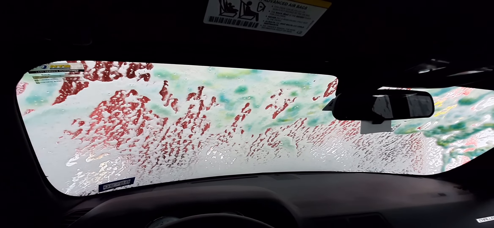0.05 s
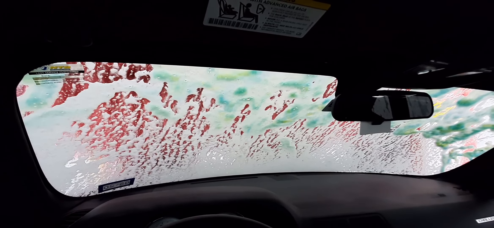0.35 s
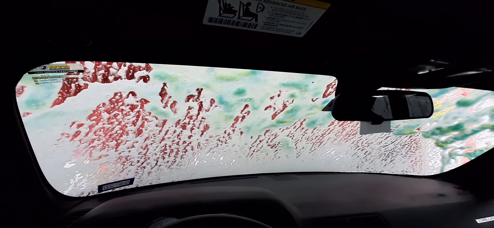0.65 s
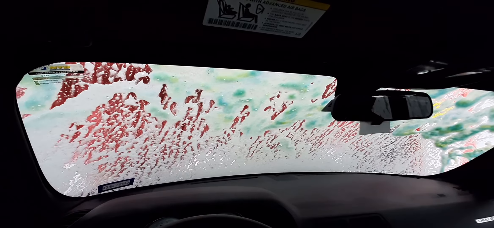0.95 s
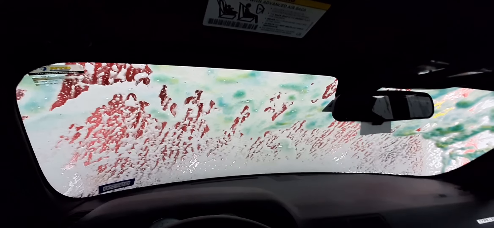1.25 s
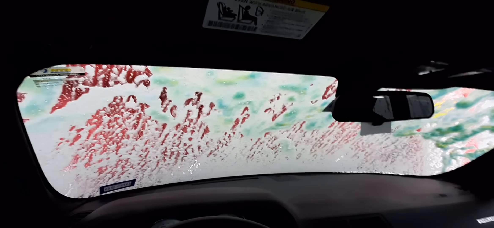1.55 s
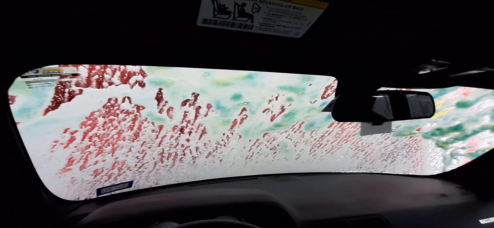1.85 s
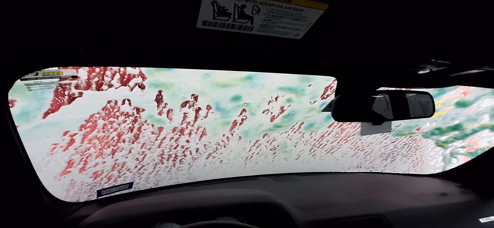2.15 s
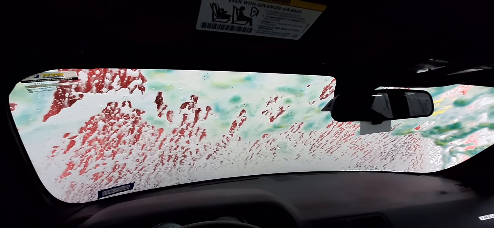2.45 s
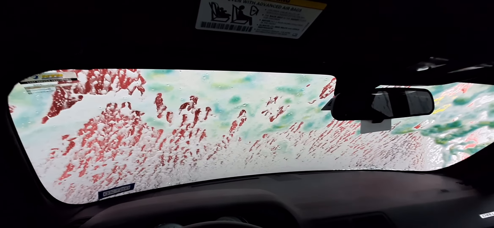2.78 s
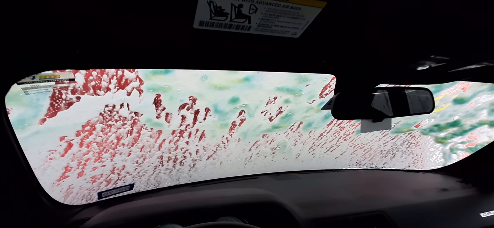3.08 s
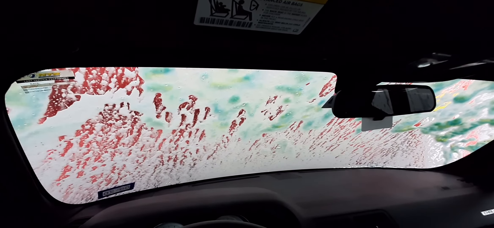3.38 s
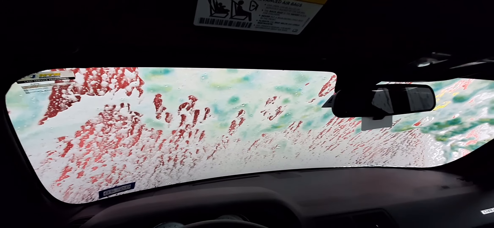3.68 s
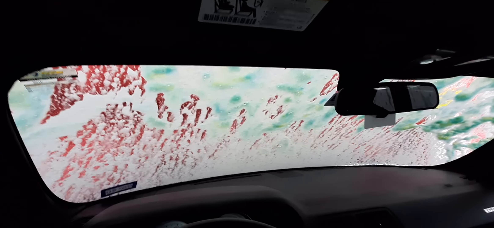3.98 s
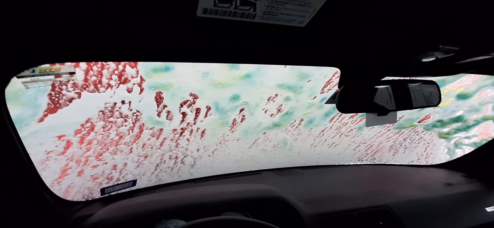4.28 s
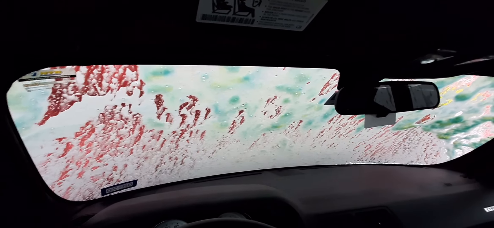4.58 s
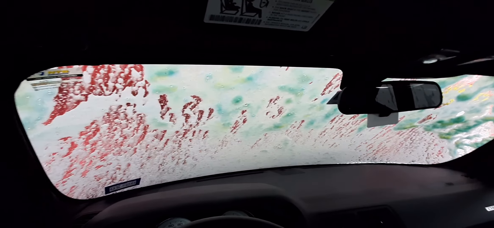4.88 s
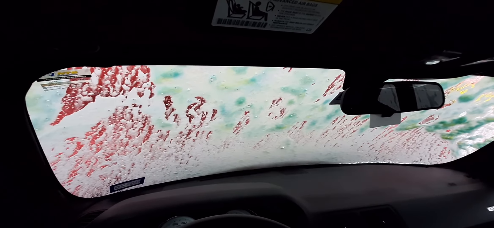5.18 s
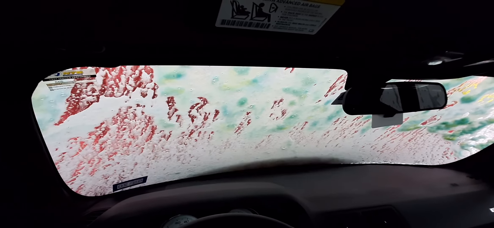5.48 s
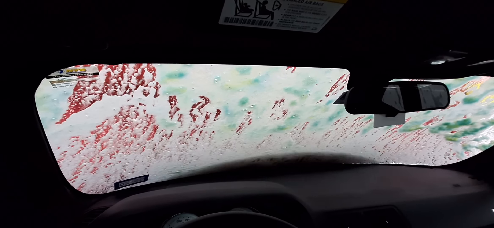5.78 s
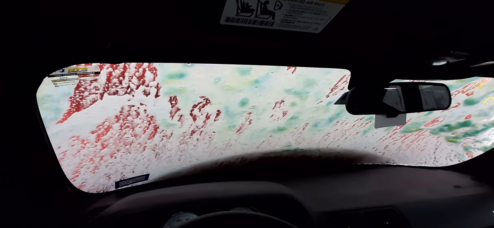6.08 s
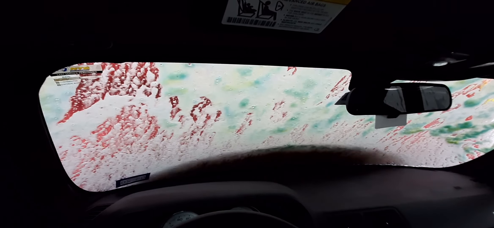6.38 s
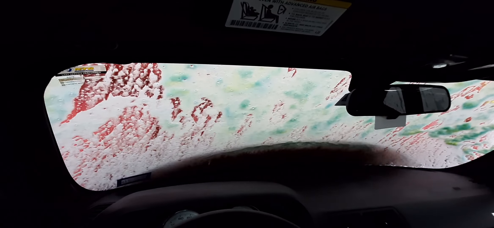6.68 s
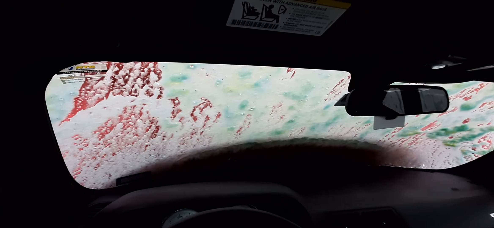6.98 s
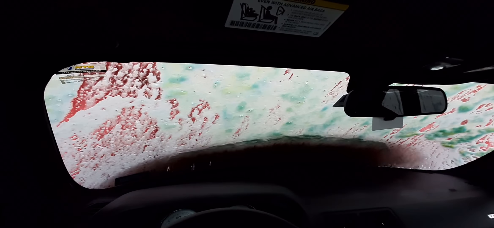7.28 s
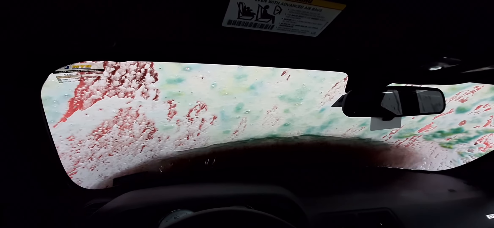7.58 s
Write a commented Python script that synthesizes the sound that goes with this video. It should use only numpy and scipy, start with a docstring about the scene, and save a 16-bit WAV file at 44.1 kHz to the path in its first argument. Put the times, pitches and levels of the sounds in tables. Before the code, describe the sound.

Foam brush strips drum and scrub on a car over humming motors, building to wet slaps and drops on the windshield, heard from inside.

```python
"""Inside a car in an automatic wash. From the start, motors rumble and pumps hum while the strips of
spinning foam brushes thump the body. Near 2 s the strips reach the hood and begin to scrub the wet paint.
Between 1.5 and 5 s, cloth rustles and a hand makes small ticks close by; at 3 s spray swishes past a
side window. From about 6 s more and more drops hit the windshield. Near 7 s the body shudders as the
brush climbs onto the glass, and soaked strips slap hard until the end."""
import sys
import numpy as np
from scipy.fft import rfft, irfft, next_fast_len
from scipy.io import wavfile
from scipy.ndimage import map_coordinates

SR = 44100
rng = np.random.default_rng(int(sys.argv[2]) if len(sys.argv) > 2 else 0)


def persist_wave(psi):
    """Save psi, clipped to +-1, as 16-bit WAV."""
    counts = np.round(np.clip(psi, -1, 1) * 32767).astype(np.int16)
    wavfile.write(sys.argv[1], SR, np.atleast_2d(counts).T)


N = 341334  # samples, about 7.7 seconds

# Levels in the tables are relative: the functions add their own gains.
# How heavily the strips land. Each row: time in seconds, thump level in dB, slap level in dB.
STRIP_WEIGHT = [(0, -41, -47), (1.6, -41, -48.5), (1.9, -41.5, -41.5), (2.3, -35.5, -39.5),
                (2.8, -35.5, -38), (3.1, -32, -34), (3.3, -35, -37), (3.7, -33.5, -37), (4.35, -32.5, -37),
                (4.8, -31, -35), (5.3, -29.5, -36.5), (5.7, -32.5, -35), (6.1, -31.5, -35),
                (6.45, -31.5, -37.5), (6.7, -30.5, -32.5), (7.3, -28, -32), (7.74, -31, -32)]
# How hard the brush tips scrub the paint. Each row: time in seconds, level in dB.
SCRUB_LEVEL = [(0, -18), (.9, -20.5), (1.2, -26), (1.62, -23.5), (1.82, -11.5), (2.3, -5), (2.85, -5),
               (3.12, -3), (3.6, -3), (4.6, 0), (5.3, 0), (6.3, 4.5), (7.0, 6.5), (7.74, 8.5)]
# Bunches of strips that make a panel boom.
# Each row: peak time in seconds, level in dB, pitch in Hz, half length in seconds.
BOOMS = [(0.021, -23, 133.7, 0.033), (0.425, -32, 149, 0.054), (1.335, -28, 106.7, .02),
         (1.913, -27, 115.3, 0.021), (2.356, -25, 123.2, 0.039), (2.453, -29, 126, 0.046),
         (3.93, -30, 125.8, 0.048), (4.273, -25, 122, 0.019), (4.492, -25.5, 158, 0.019),
         (4.593, -24, 156.8, 0.027), (5.07, -25.5, 162, 0.031), (5.164, -21.5, 157, .037),
         (5.259, -21, 159.2, 0.03), (5.454, -24, 119.6, .026), (5.906, -22.5, 160.3, 0.032),
         (6.706, -22, 147, 0.015), (7.028, -21.5, 125.8, 0.031), (7.272, -23, 116.7, 0.027),
         (7.516, -23, 120.3, 0.016), (7.686, -25, 164.4, 0.046)]
# Hard slaps of single strips. Each row: time in seconds, level in dB.
HARD_SLAPS = [(1.389, -51), (1.965, -51), (3.347, -43), (4.417, -41), (6.782, -26.5), (6.861, -35),
              (6.936, -28), (7.211, -26), (7.248, -28), (7.299, -23), (7.393, -26.5), (7.444, -20.5),
              (7.546, -26), (7.579, -27), (7.616, -20), (7.661, -25), (7.698, -25.5)]
# How much spray reaches the glass. Each row: time in seconds, level in dB.
SPRAY_LEVEL = [(0, -67.5), (.72, -70), (1.1, -75.5), (1.9, -72.5), (2.4, -65.5), (4.3, -64.5), (4.9, -62),
               (5.85, -59.5), (6.35, -52), (7.35, -42), (7.74, -41.5)]
# The biggest drops on the windshield. Each row: time in seconds, level in dB, pitch in Hz.
BIG_DROPS = [(6.3226, -38, 4290), (6.3944, -32, 3170), (6.4683, -37, 3310), (6.5075, -33.5, 3530),
             (6.602, -41, 4280), (6.6832, -30.5, 4710), (6.868, -29, 4730), (6.913, -31.5, 4310),
             (6.9432, -31.5, 3820), (6.9638, -34.5, 3480), (7.0035, -35.5, 4790), (7.0214, -43, 4340),
             (7.0847, -34, 2910), (7.1174, -29.5, 3700), (7.1499, -25, 3970), (7.1625, -24.5, 3770),
             (7.2194, -33.5, 3800), (7.2537, -27.5, 3700), (7.2763, -28.5, 4000), (7.305, -32, 3830),
             (7.3315, -33.5, 3610), (7.3635, -28, 3390), (7.38, -24, 4630), (7.4135, -25, 3110),
             (7.4568, -33.5, 3640), (7.51, -28.5, 3980), (7.5258, -23, 4600), (7.549, -30.5, 3840),
             (7.5618, -26, 3150), (7.6259, -19, 4600), (7.643, -34, 4780), (7.675, -28, 4000),
             (7.691, -29, 4550), (7.7098, -24, 3860)]
# Slides of cloth. Each row: peak time in seconds, level in dB, rise and fall in seconds, extra hiss in dB.
CLOTH_SLIDES = [(2.07, -77, 0.066, 0.12, 6.5), (2.35, -68.5, 0.12, 0.16, 6.5),
                (3.25, -70.5, 0.06, 0.07, 1.5), (3.66, -74, 0.22, 0.25, 4.5), (4.5, -60, 0.15, 0.051, -6),
                (4.63, -49.5, 0.085, 0.12, 1)]
# Ticks of a hand. Each row: start in seconds, level in dB, left minus right in dB,
# treble tilt in dB per octave, echo level in dB, ringing pitch in Hz.
HAND_TICKS = [(1.5532, -20, 18, 0.5, -17.5, 1040), (1.5553, -13, 23, -0.5, -13, 1040),
              (1.5577, -18.5, 21, 4, -12.5, 1040), (1.5593, 2.5, 25, 2, -35.5, 1040),
              (1.825, -26, -2, -8, -6.5, 3150), (2.326, -42, -6, 7.5, -18, 7000),
              (2.333, -42.5, 6, 22, -12.5, 6960), (4.382, -34, 4, 2.5, -3, 5800),
              (4.494, -26.5, 5, 3.5, -4.5, 6000)]

# Resonances, the pitches at which a thing likes to ring. Each row: pitch in Hz, width in Hz, level in dB.
PANEL_MODES = [(77.2, 10, 5), (117.5, 27, 1.5), (158.6, 20, -2), (272, 40, -2.5), (350.7, 27, 4),
               (530, 22, -7.5), (827, 49, 2.5), (1543, 23, 4), (1844, 98, 1), (2044, 46, 9),
               (2216, 57, 5.5)]  # body panels and cabin
HOOD_MODES = [(667, 270, 0)]  # the sheet of the hood
BODY_MODES = [(44, 23, 0)]  # the whole body shaking
WINDSHIELD_MODES = [(805.4, 58, 0), (1234, 320, -3.5), (2000, 300, -6)]  # the hollow-sounding pane
PUMP_MODES = [(51, 39, 2), (347, 26, 8.5), (830, 31, -15), (1525, 57, -10.5), (2033, 96, -24)]  # droning motors and pumps

# Tone colours, from bass to treble. Each row: frequency in Hz, level in dB.
THUMP_TONE = [(20, -35.5), (40, -29.5), (65, -10.5), (110, -2), (165, 0), (215, -4.5), (300, -17.5),
              (600, -84.5)]  # heavy strips landing
SLAP_TONE = [(130, -31), (220, 1.5), (290, -3), (380, -5.5), (480, -8), (600, -14), (900, -21.5),
             (2000, -81.5)]  # their tips landing
SCRUB_TONE = [(350, -20), (520, 2.5), (610, 3), (740, 4.5), (830, 0), (1020, 0.5), (1380, -1.5), (1650, -8),
              (2200, -20), (2700, -16.5), (5000, -56.5)]  # tips dragging over wet paint
KNOCK_TONE = [(250, 0), (550, -6.5), (790, 3.5), (1100, -4.5), (1500, -5), (2300, -20), (4000, -19.5),
              (9000, -65.5)]  # a panel or pane being struck
SMACK_TONE = [(500, -11), (850, 5.5), (1300, 4.5), (2100, -6.5), (3200, -9), (5000, -14), (8000, -31),
              (10000, -50)]  # the wet smack of a soaked strip
MIST_TONE = [(900, -26), (2000, 2), (2700, -2.5), (3300, 4), (4700, 0), (5600, -4), (7800, -11.5),
             (9000, -58), (11500, -14.5), (13500, -20), (16000, -30)]  # distant spray
PATTER_TONE = [(700, -13.5), (1300, 8), (2000, 2.5), (2700, -8), (3300, -4), (4700, -0.5), (5600, -11),
               (7800, -6.5), (9000, -20.5), (11500, -8.5), (13500, -21.5), (16000, -38)]  # small drops right on the glass
FIZZ_TONE = [(5000, -14), (8000, -1), (9000, -9), (11500, 2.5), (13500, -4), (15700, -14)]  # the first fine spray on the glass
SWISH_TONE = [(1200, 0), (1700, 7), (2300, 9), (2850, 12), (3500, -1), (5000, -10), (8000, -30)]  # spray passing the side window
SPLASH_TONE = [(600, -8), (1000, 1), (1500, 2), (2500, -2), (3200, 0), (4700, 1), (5800, -6), (7800, -8),
               (9000, -24), (11500, -26), (15000, -48)]  # a big drop bursting
WEAVE_TONE = [(900, -9), (1600, 9.5), (2400, 8), (3000, 9), (4100, 9), (6000, 5), (7900, 3), (9000, -24.5),
              (11000, -26)]  # the rasp of cloth catching
FIBRE_TONE = [(4000, -6.5), (7500, -24), (9200, -15), (11300, 2), (13500, 4), (14600, -4), (15700, -8)]  # the thin hiss of cloth sliding
TICK_TONE = [(200, -1), (600, -4), (1050, 5), (2200, -11), (3100, 1.5), (5000, -2), (7700, -6.5),
             (8800, -27.5), (11500, -14), (15500, -26)]  # a hand on plastic
RUMBLE_TONE = [(20, -28), (40, -15.5), (55, -6), (105, 1), (158, -1.5), (200, -8), (360, -11), (515, -15.5),
               (565, -30), (800, -33), (1000, -36.5), (1300, -31.5), (1900, -47), (2700, -53), (7600, -50),
               (9200, -90)]  # motors behind closed doors
AIR_TONE = [(9000, -19.5), (10600, 6), (12000, 4), (15700, 4.5)]  # faint, very high hiss

# How alike the two ears hear the cabin. Each row: frequency in Hz, likeness (1 is the same, 0 unrelated).
EAR_LIKENESS = [(60, 1), (140, 0.9), (300, 0.75), (650, 0.67), (1400, -0.24), (4000, 0.07), (12000, 0)]
# Which ear hears more. Each row: frequency in Hz, left minus right in dB.
EAR_BALANCE = [(100, 0), (200, -1.7), (380, -1.5), (800, -2.5), (1500, -4.5), (4400, -3.5), (12000, -2)]


def brushes(scrub_db=-43):
    """Heavy strips thump the body; their tips slap it and drag over the paint in tiny slips."""
    contact_db, = curves(SCRUB_LEVEL)
    thump_db, slap_db = curves(STRIP_WEIGHT)
    bunching = wobble(22)  # the strips arrive in bunches
    thumps = cabin(panels(impacts(rate=450, spread_db=0)), THUMP_TONE)
    tips = cabin(panels(impacts(rate=800, spread_db=2.5)), SLAP_TONE)
    slips = cabin(panels(impacts(rate=1300, spread_db=1.5) + 0.99 * noise()), SCRUB_TONE)
    return (amp(thump_db) * thumps
            + amp(slap_db + 0.41 * bunching) * tips
            + amp(scrub_db + contact_db + 0.42 * bunching) * slips)


def booms(gain_db=-2):
    """Each bunch of strips sets a panel swinging at one low pitch for a few cycles."""
    t = np.arange(N) / SR
    drift = 0.47 * wobble(70)  # makes the pitch waver
    out = np.zeros(N)
    for peak_s, db, hz, half_s in BOOMS:
        tone = np.sin(2 * np.pi * (hz * t + rng.random()) + drift)
        out += amp(db + gain_db) * swell(peak_s, half_s, half_s) * tone
    return out


def hood(level_db=-54):
    """The first strips drag over the wide hood, which roars and calms as the brush moves on."""
    drag = noise() + impacts(rate=480, spread_db=1)
    roar = filtered(drag, lambda hz: resonances(HOOD_MODES, hz))
    return amp(level_db) * swell(peak_s=1.865, rise_s=0.1, fall_s=1.47) * cabin(roar, SCRUB_TONE)


def slaps(knock_db=-4, smack_db=-10, knock_t60=0.086, smack_t60=0.067, delay_s=0.00161):
    """A soaked strip lands flat with a wet smack and drums briefly on the pane or panel."""
    t = np.arange(-SR // 50, SR // 8) / SR
    knock = cabin(panels(noise()), KNOCK_TONE)
    smack = cabin(noise(), SMACK_TONE)
    out = np.zeros((2, N + SR))
    for layer_db, t60, sound in [(knock_db, knock_t60, knock), (smack_db, smack_t60, smack)]:
        shape = burst(t, rise_t60=0.017, fall_t60=t60)
        shape_rms = np.sqrt(np.mean(shape ** 2))
        for time_s, db in HARD_SLAPS:
            pick = rng.integers(N - len(t))  # each slap takes a random piece of the noise
            blow = unit(shape * sound[:, pick:pick + len(t)]) * shape_rms
            start = round((time_s + delay_s + t[0]) * SR)
            out[:, start:start + len(t)] += amp(db + layer_db) * blow
    return out[:, :N]


def shudder(level_db=-45):
    """The whole body gives a deep, brief shake as the brush climbs onto the windshield."""
    shake = filtered(noise(), lambda hz: resonances(BODY_MODES, hz))
    return amp(level_db) * swell(peak_s=6.8, rise_s=0.17, fall_s=0.17) * cabin(shake, THUMP_TONE[:3])


def spray(mist_db=3, patter_db=2, near_db=-48, swish_db=-57, fizz_db=-64.5):
    """Distant spray is a smooth hiss; near the glass it breaks up into clumps of single drops."""
    level_db, = curves(SPRAY_LEVEL)
    drop_share = 1 / (1 + amp(2 * (near_db - level_db)))  # one half when the level reaches near_db
    mist = amp(mist_db) * np.sqrt(1 - drop_share) * cabin(noise(), MIST_TONE)
    drops = droplets()
    clumps_db = 1.4 * wobble(28) + 2.4 * wobble(160)
    patter = amp(patter_db + clumps_db) * np.sqrt(drop_share) * cabin(drops + 1.27 * noise(), PATTER_TONE)
    swish = swell(peak_s=3.0, rise_s=0.031, fall_s=0.23) * cabin(noise(), SWISH_TONE)
    fizz = swell(peak_s=6.3, rise_s=0.35, fall_s=0.45) * cabin(noise(), FIZZ_TONE)
    return amp(level_db) * (mist + patter) + amp(swish_db) * swish + amp(fizz_db + clumps_db) * fizz


def droplets(rate=840, pitch_hz=5600, pitch_spread=0.5, fade_cycles=0.5, spread_db=7):
    """Two showers of small drops: each is a soft, nearly toneless blip of its own pitch and size."""
    t = np.arange(SR // 200) / SR
    count = int(rate * N / SR)
    showers = []
    for starts in rng.integers(0, N, (2, count, 1)):
        pitch, size = np.clip(rng.standard_normal((count, 2)).T[..., None], -2.2, 2.2)
        hz = pitch_hz * np.exp(pitch_spread * pitch)
        cycles = hz * t
        shape = cycles * np.exp(-cycles / fade_cycles)
        blips = amp(spread_db * size) * np.sqrt(hz) * shape * np.sin(2 * np.pi * cycles)
        places = starts + np.arange(len(t))
        showers.append(np.bincount(places.ravel(), blips.ravel(), N)[:N])  # add each blip at its place
    return unit(np.array(showers))


def big_drops(crack_db=-3, splash_db=-14, knock_db=-7, ring_db=6, ring_width_hz=700, delay_s=0.0018):
    """Fine spray runs ahead of a big drop; it bursts with a wet ping, knocks the glass and scatters."""
    t = np.arange(-SR // 20, SR // 10) / SR
    crack = amp(crack_db) * burst(t, rise_t60=0.0044, fall_t60=0.0089)
    splash = amp(splash_db) * burst(t, rise_t60=0.065, fall_t60=0.16)
    knock = amp(knock_db) * burst(t, rise_t60=0.0044, fall_t60=0.037)
    pings, knock_gain = np.zeros((2, N + SR)), np.zeros(N + SR)
    for time_s, db, pitch_hz in BIG_DROPS:
        ring = [(pitch_hz, ring_width_hz, ring_db)]
        ping = filtered(rng.standard_normal((2, len(t))),
                        lambda hz: amp(along(SPLASH_TONE, hz)) * np.sqrt(1.5 + resonances(ring, hz)))
        start = round((time_s + delay_s + t[0]) * SR)
        pings[:, start:start + len(t)] += amp(db) * (crack + splash) * unit(ping)
        knock_gain[start:start + len(t)] += amp(db) * knock
    return pan(-3) * pings[:, :N] + knock_gain[:N] * cabin(panels(noise()), KNOCK_TONE)


def windshield(gain_db=2.5):
    """The pane rings hollow as ever more water and strips land on it."""
    level_db, = curves(SPRAY_LEVEL)
    drumming = filtered(impacts(rate=600, spread_db=1.5), lambda hz: resonances(WINDSHIELD_MODES, hz))
    return amp(level_db + gain_db) * cabin(drumming, KNOCK_TONE)


def cloth(weave_db=7, firm_db=-47):
    """Sliding cloth hisses thinly; pressed harder, its weave catches and adds a fuller rasp."""
    slide, hiss = np.zeros((2, N))
    for peak_s, db, rise_s, fall_s, hiss_db in CLOTH_SLIDES:
        stroke = amp(db) * swell(peak_s, rise_s, fall_s)
        slide += stroke
        hiss += amp(hiss_db) * stroke
    rasp = amp(weave_db) * slide * (slide / amp(firm_db)) ** 0.21  # grows faster than the hiss
    catching = amp(0.5 * wobble(25) + 1.1 * wobble(220))
    fibres = unit(coloured(noise() + 0.5 * impacts(rate=3700, spread_db=1), FIBRE_TONE))
    weave = unit(coloured(noise() + 0.5 * impacts(rate=1300, spread_db=2.5), WEAVE_TONE))
    return catching * (hiss * fibres + rasp * weave)


def ticks(echo_gain_db=-8, echo_t60=0.042, pivot_hz=3500, ring_width_hz=350, ring_db=11):
    """A hand ticks on plastic: a dry click, then a short echo in which the touched trim rings."""
    t = np.arange(SR // 10) / SR
    octaves = lambda hz: np.log2(np.maximum(hz / pivot_hz, 0.5))
    out = np.zeros((2, N + SR))
    for start_s, db, pan_db, tilt, echo_db, ring_hz in HAND_TICKS:
        ring = [(ring_hz, ring_width_hz, ring_db)]
        trim = filtered(rng.standard_normal((2, len(t))), lambda hz: np.sqrt(0.5 + resonances(ring, hz)))
        click = t == 0
        echo = amp(echo_gain_db + echo_db - 60 * t / echo_t60) * trim
        tick = filtered(click + echo, lambda hz: amp(along(TICK_TONE, hz) + tilt * octaves(hz)))
        start = round(start_s * SR)
        out[:, start:start + len(t)] += amp(db) * unit(pan(pan_db)) * tick
    return out[:, :N]


def machinery(rumble_db=-42, whine_db=-47):
    """Motors make a restless rumble behind the closed doors, and pumps whine over it."""
    motors = filtered(noise(), lambda hz: np.sqrt(1 + resonances(PANEL_MODES[:3], hz)))
    pumps = filtered(noise(), lambda hz: np.sqrt(resonances(PUMP_MODES, hz)))
    rumble = cabin(motors, RUMBLE_TONE)
    whine = cabin(pumps, tone=[(25, -23.5), (45, 2.5), (2100, -4.5), (2700, -25)])
    return amp(rumble_db + 0.87 * wobble(7.3)) * rumble + amp(whine_db + wobble(11)) * whine


def hum(pitch_hz=119.6, level_db=-47):
    """A pump motor hums, a little unsteady under its load."""
    gain = amp(level_db + 1.5 * wobble(3.5))
    return gain * np.sin(2 * np.pi * pitch_hz * np.arange(N) / SR + 0.64 * wobble(7))


def panels(x):
    """The car body passes the whole sound and rings along at its resonances."""
    return filtered(x, lambda hz: np.sqrt(1 + 2 * resonances(PANEL_MODES, hz)))


def cabin(pair, tone):
    """Colours two noises as heard inside: bass alike in both ears, treble wide and more to the right."""
    signs = np.array([[1], [-1]])
    likeness = lambda hz: np.clip(along(EAR_LIKENESS, hz), -0.99, 0.99)
    shared, opposed = filtered(pair, lambda hz: amp(along(tone, hz)) * np.sqrt(1 + signs * likeness(hz)))
    ears = np.array([shared + opposed, shared - opposed])
    return unit(filtered(ears, lambda hz: amp(signs * along(EAR_BALANCE, hz) / 2)))


def resonances(modes, hz):
    """How much power a ringing thing passes at each frequency."""
    return sum(amp(db) ** 2 / (1 + (2 * (hz - pitch) / width) ** 2) for pitch, width, db in modes)


def impacts(rate, spread_db):
    """Two streams of random blows, about rate a second; spread_db makes their sizes uneven."""
    hits = rng.random((2, N)) < rate / SR
    return unit(hits * amp(spread_db * noise()) * np.sign(noise()))


def noise():
    """Two unrelated white noises."""
    return rng.standard_normal((2, N))


def wobble(rate):
    """A smooth curve through rate random points a second."""
    points = rng.standard_normal(int(N * rate / SR) + 4)
    return map_coordinates(points, [np.arange(N) * rate / SR])


def swell(peak_s, rise_s, fall_s):
    """A bell-shaped gain that reaches 1 at peak_s."""
    t = np.arange(N) / SR - peak_s
    return np.exp(-(t / np.where(t < 0, rise_s, fall_s)) ** 2)


def burst(t, rise_t60, fall_t60):
    """A gain that shoots up to 1 at t = 0 and dies away. A t60 is the seconds it takes to move 60 dB."""
    return amp(-60 * np.maximum(t / fall_t60, -t / rise_t60))


def filtered(x, gain):
    """Scales each frequency of x by gain(hz), so that ringing comes after a hit and never before."""
    n = x.shape[-1]
    size = 2 * next_fast_len(n // 2 + SR // 8)
    hz = np.fft.rfftfreq(size, 1 / SR)
    cepstrum = irfft(np.log(np.maximum(gain(hz), 1e-6)))  # the log of the gain, laid out in time
    cepstrum[..., 1:size // 2] *= 2  # fold the part before time zero onto the part after it
    cepstrum[..., size // 2 + 1:] = 0
    return irfft(rfft(x, size) * np.exp(rfft(cepstrum)), size)[..., :n]


def coloured(x, tone):
    """Gives x a tone colour made of (Hz, dB) points."""
    return filtered(x, lambda hz: amp(along(tone, hz)))


def along(points, hz):
    """Reads between (Hz, value) points on a log frequency scale."""
    point_hz, values = np.transpose(points)
    return np.interp(np.log(hz + 1), np.log(point_hz), values)


def curves(rows):
    """Joins timed rows with straight lines: one curve for each column after the time."""
    times, *columns = np.transpose(rows)
    return [np.interp(np.arange(N) / SR, times, column) for column in columns]


def pan(db):
    """Left and right gains that lie db apart; positive favours the left."""
    return amp([[db / 2], [-db / 2]])


def unit(x):
    """Scales x to an average strength (rms) of 1."""
    return x / np.sqrt(np.mean(x ** 2) + 1e-20)


def amp(db):
    """Turns decibels into a gain to multiply by."""
    return 10 ** (np.asarray(db) / 20)


def scene(air_db=-75):
    """The wash outside, the small sounds inside and a trace of hiss."""
    air = amp(air_db) * unit(coloured(noise(), AIR_TONE))
    body = brushes() + booms() + hood() + slaps() + shudder() + windshield()
    return body + machinery() + hum() + spray() + big_drops() + cloth() + ticks() + air


def record(dry, top_hz=15750):
    """Cuts away all treble above top_hz."""
    size = next_fast_len(N + SR // 2)
    passes = np.fft.rfftfreq(size, 1 / SR) < top_hz
    return irfft(rfft(dry, size) * passes, size)[:, :N]


dry = scene()
out = record(dry)
persist_wave(out)
```